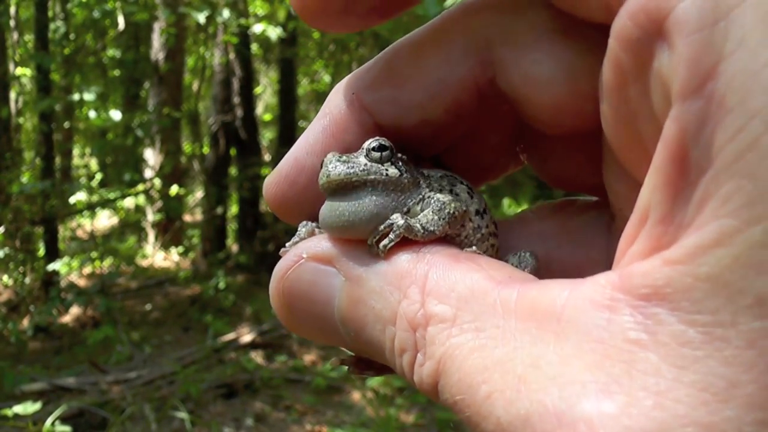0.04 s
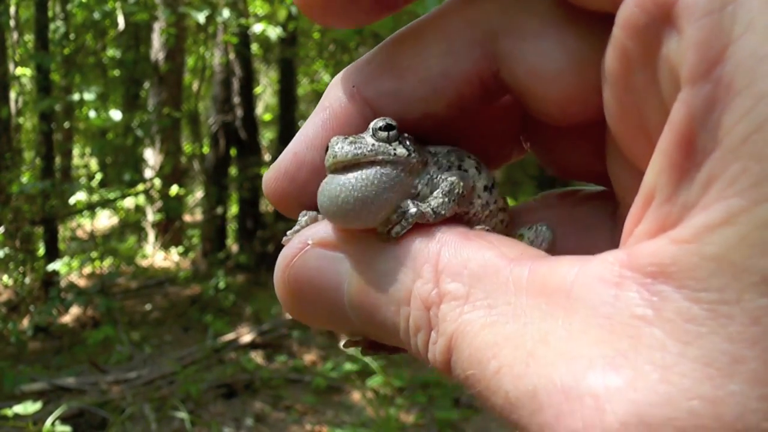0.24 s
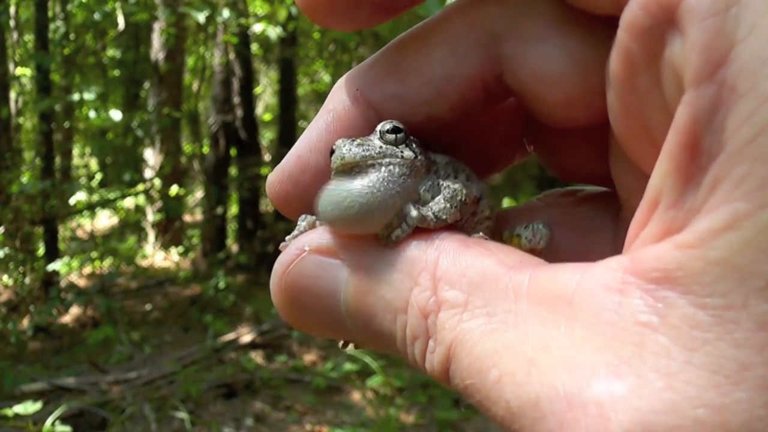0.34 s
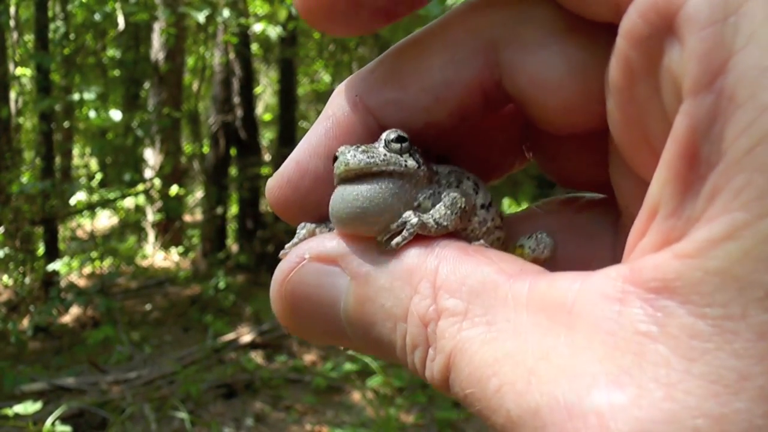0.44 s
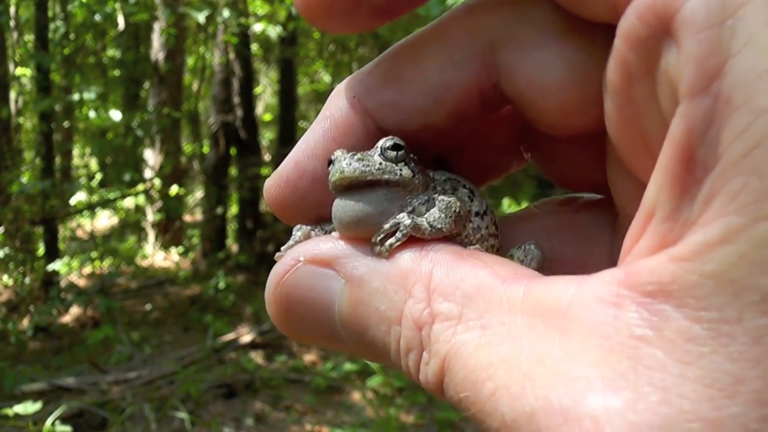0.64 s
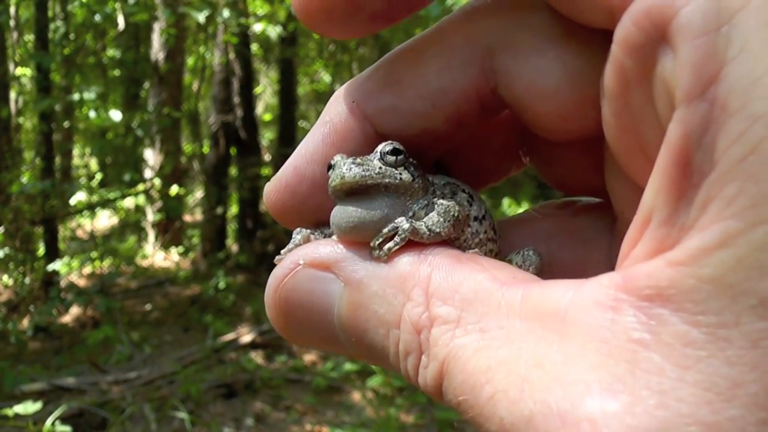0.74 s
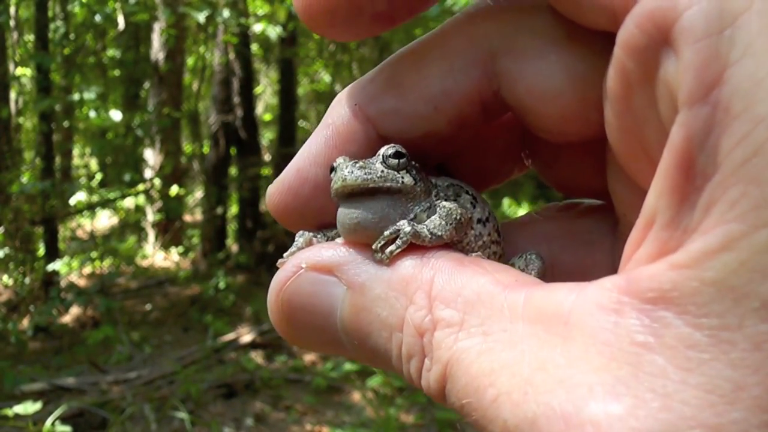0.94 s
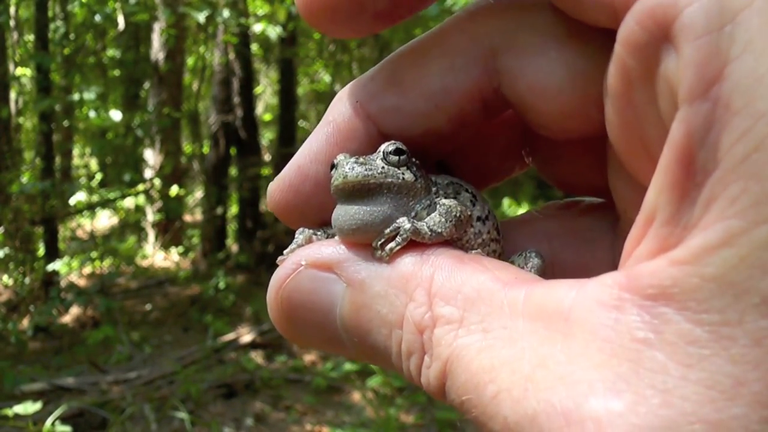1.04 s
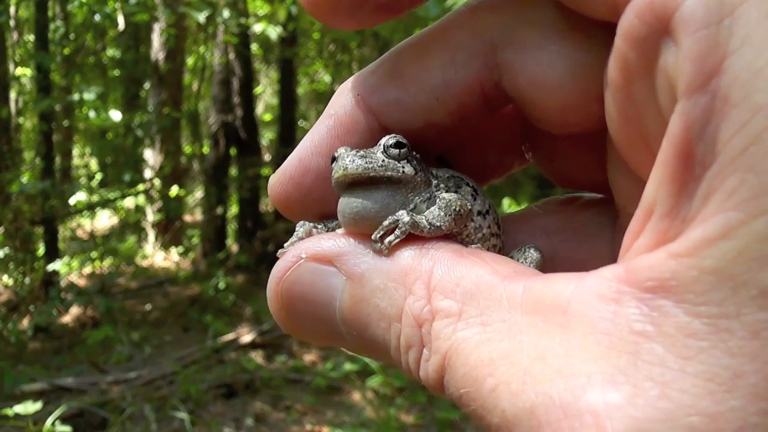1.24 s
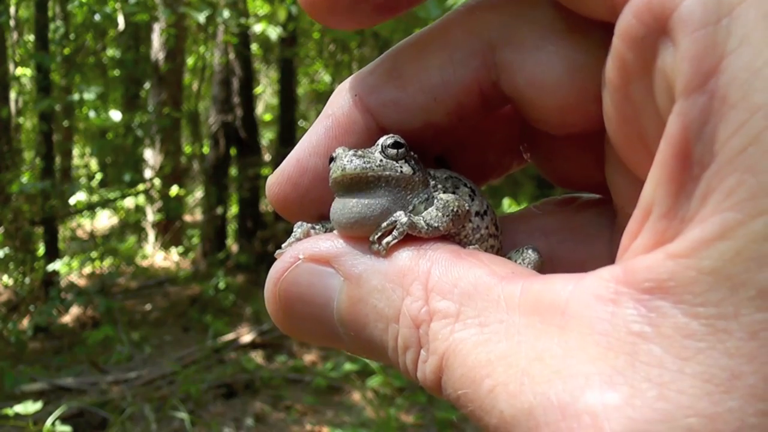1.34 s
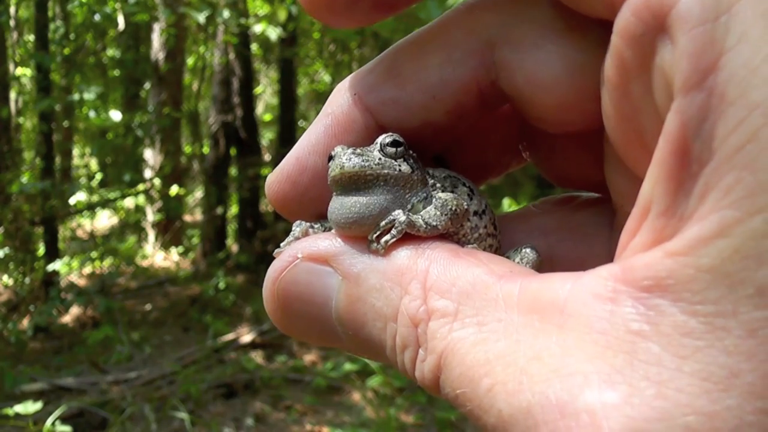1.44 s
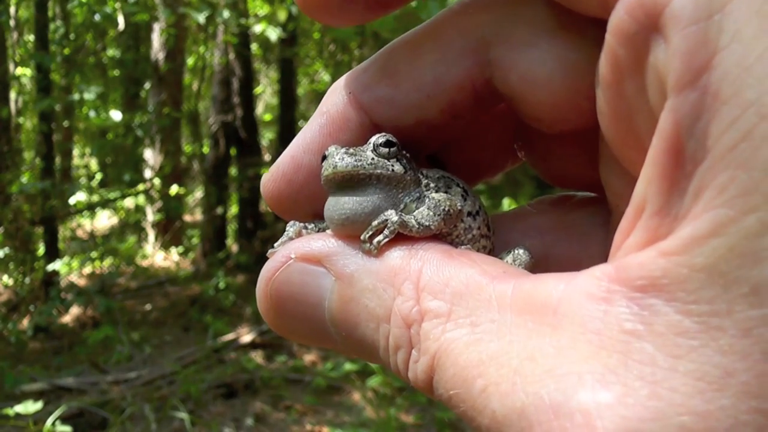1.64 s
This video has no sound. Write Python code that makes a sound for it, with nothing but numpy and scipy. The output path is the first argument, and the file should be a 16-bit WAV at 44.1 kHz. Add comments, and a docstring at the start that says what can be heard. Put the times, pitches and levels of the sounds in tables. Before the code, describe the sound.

A tree frog close to the microphone barks twice in quick succession, short and harsh, with a thin hiss between. Afterwards, faint rustles and a distant bird sound over the low, steady murmur of a wood.

```python
"""In a wood, a tree frog held in a hand close to the microphone gives two short harsh barks.
Each starts with a few loose pops of the larynx, then a fast, lurching pulse train rings the throat
and vocal sac. Air hisses between the barks; faint rustles and a far bird follow. The trees echo,
and the recorder's gain control ducks the murmur of the wood after each bark."""
import sys
import numpy as np
from scipy import signal
from scipy.fft import rfft, irfft
from scipy.io import wavfile
from scipy.ndimage import uniform_filter1d, minimum_filter1d

SR = 44100
rng = np.random.default_rng(int(sys.argv[2]) if len(sys.argv) > 2 else 0)


def wrap_up_sound(samples):
    """Save the sound to the file named by the first command line argument, as 16-bit audio."""
    columns = np.atleast_2d(samples).T
    # keep every value between -1 and 1, then stretch to whole-number steps
    tamed = np.clip(columns, -1, 1)
    steps = np.round(tamed * 32767).astype(np.int16)
    wavfile.write(sys.argv[1], SR, steps)


N = 74970
TIME, FREQS = np.arange(N) / SR, np.fft.rfftfreq(N, 1 / SR)


def amp(db):
    """Decibels to gain."""
    return 10 ** (np.asarray(db) / 20)


def unit_rms(x):
    """Scales to rms 1."""
    return x / np.sqrt(np.mean(x ** 2) + 1e-20)


def read(points, hz):
    """Reads a table on a log-frequency axis."""
    f, value = np.transpose(points)
    return np.interp(np.log(hz + 1), np.log(f + 1), value)


def add(mix, s, sound):
    """Mixes a sound in at time s."""
    part = mix[max(round(s * SR), 0):][:len(sound)]
    part += sound[:len(part)]


def noise(spectrum, size):
    """Noise of a given spectrum."""
    return unit_rms(irfft(rfft(rng.standard_normal(N)) * amp(read(spectrum, FREQS)), N))[:size]


def drift(rate_hz, size):
    """Random wander of rms about 1."""
    return unit_rms(irfft(rfft(rng.standard_normal(N)) * np.exp(-FREQS / rate_hz), N))[:size]


def ring(spectrum, size=2048):
    """Causal response of a body with a given spectrum, energy 1."""
    log_gain = np.log(amp(read(spectrum, abs(np.fft.fftfreq(size, 1 / SR)))))
    response = np.fft.ifft(np.exp(np.conj(signal.hilbert(log_gain)))).real[:size // 2]
    return response / np.linalg.norm(response)


def resonate(x, hz, width_hz):
    """A steady or gliding resonance of gain 1."""
    turn = np.exp(2j * np.pi * np.cumsum(hz * np.ones(len(x))) / SR)
    radius = np.exp(-np.pi * width_hz / SR)
    return 2 * (turn * signal.lfilter([1 - radius], [1, -radius], x / turn)).real


def tone(hz):
    """A sine that follows a pitch curve."""
    return np.sin(2 * np.pi * np.cumsum(hz) / SR)


# Murmur all around the microphone: f/Hz, relative level/dB
MURMUR_SPECTRUM = [(15, -47.5), (25, -23), (41, -13), (82, 0.5), (111, -1), (223, -5), (326, -2.5),
                   (363, -7.5), (394, -4.5), (516, -9), (677, -6.5), (1560, -13.5), (1940, -20.5),
                   (2160, -20), (6920, -32), (12900, -40.5), (16000, -46)]
# Likeness of its left and right channels: f/Hz, coherence/0-1
MURMUR_COHERENCE = [(60, 0.69), (130, 0.21), (290, 0.02), (640, 0.66), (1410, 0.88), (3100, 0.97),
                    (6820, 0.91), (15000, 0.2)]
# Hum in the distance: f/Hz, level/dB
HUM_TONES = [(120, -71), (399, -70.5), (699, -73)]
def wood(murmur_db=-54, waver=.003):
    """Steady murmur of the wood, with a faint distant hum."""
    coherence = np.clip(read(MURMUR_COHERENCE, FREQS), 0, 1)
    mid, side = (irfft(rfft(noise(MURMUR_SPECTRUM, N)) * np.sqrt(share / 2), N)
                 for share in (1 + coherence, 1 - coherence))
    hum = sum(amp(db) * np.sqrt(2) * tone(hz * (1 + waver * drift(10, N))) for hz, db in HUM_TONES)
    return amp(murmur_db) * np.array([mid + side, mid - side]) + hum


# Larynx pops, close up: t/s, relative level/dB, pitch/ratio to POP_SPECTRUM
LARYNX_POPS = [(.2186, -25, .75), (.2220, -11, .9), (.4038, -24, 1), (.4069, -11, 1), (.4080, -3, 1.03)]
# Colour of one pop: f/Hz, relative level/dB
POP_SPECTRUM = [(100, -42.5), (600, -29), (1200, -6), (2000, 4), (2900, -0.5), (3700, -10.5), (4500, -26.5),
                (6500, -42.5), (8400, -27.5), (11000, -51.5), (16000, -62.5)]
def pops(gain_db=.5):
    """The larynx lets go a few loose, single pulses before each bark."""
    out = np.zeros(N)
    for s, db, pitch in LARYNX_POPS:
        pop = ring(np.array(POP_SPECTRUM) * [pitch, 1])
        add(out, s, amp(gain_db + db) * pop / abs(pop).max())
    return out


# Echo from the surrounding trees: f/Hz, time to fall 60 dB/s, relative level/dB
TREE_ECHO = [(200, .4, -4), (1500, 0.92, 0), (2000, .6, 3.5), (2400, .6, -2.5), (2770, 0.58, 3),
             (3500, 0.96, 0.5), (7000, 0.42, 3), (14000, 0.15, -0.5)]
def trees(x, spread=.35):
    """Trunks and leaves scatter the sound into a diffuse stereo tail."""
    hz, t, spectra = signal.stft(rng.standard_normal((2, SR)), SR, nperseg=256)
    t60, db = (read(np.array(TREE_ECHO)[:, [0, k]], hz)[:, None] for k in (1, 2))
    mid, side = signal.istft(spectra * amp(db - 60 * t / t60), SR, nperseg=256)[1]
    tail = np.array([mid + spread * side, mid - spread * side]) / np.linalg.norm(mid)
    return signal.fftconvolve(x[None], tail, axes=1)[:, :N]


def larynx(times, rate_hz, level_db, roughness, jitter=.14, shimmer_db=5, air_db=-2):
    """A train of pulses, each with a breath of air; roughness upsets their timing and strength."""
    pulses, air, taps = np.zeros(N), np.zeros(N), np.arange(64)
    at, lead = times[0], len(taps) // 2
    for late, strong in rng.standard_normal((80, 2)):
        if at > times[-1]:
            break
        harsh, period = np.interp(at, times, roughness), 1 / np.interp(at, times, rate_hz)
        size = amp(np.interp(at, times, level_db) + shimmer_db * harsh * strong) * np.sqrt(period * SR)
        pulse = np.sinc(taps - lead - at * SR + round(at * SR)) * np.hanning(len(taps))
        add(pulses, at - lead / SR, size * pulse)
        add(air, at, size * harsh * np.exp(-taps / 16) / np.sqrt(8))
        at += period * np.exp(jitter * harsh * late)
    return pulses + amp(air_db) * air * rng.standard_normal(N)


def smear(x, hz=2300, width_hz=1300):
    """An all-pass spreads each pulse in time without changing its spectrum."""
    radius = np.exp(-np.pi * width_hz / SR)
    poles = [1, -2 * radius * np.cos(2 * np.pi * hz / SR), radius ** 2]
    return signal.lfilter(poles[::-1], poles, x)


# The frog at the microphone, one list per bark:
# t/s, pulse rate/Hz, relative level/dB, roughness/0-1, upper resonance f/Hz, its gain/dB
BARK_CURVES = [
    [(.2299, 857, -8.5, .3, 8100, 14), (.2345, 833.7, -14, .45, 8000, 14),
     (.2385, 930.6, -11, .25, 7920, 17.5), (.243, 992, -15, 0.42, 8000, 7),
     (.246, 765.7, -1.5, .7, 8230, 3.5), (.249, 906, -8, .15, 8230, 6.5), (.254, 887, -9, .15, 7964, 5.5),
     (.2585, 779, -20, .5, 5980, 7.5), (.2625, 820, -8, .15, 6200, 11.5), (.268, 747, -9, .2, 6720, 16),
     (.274, 696, -33.5, .2, 6910, -1.5)],
    [(.4263, 490.4, -5, .4, 5500, 11), (.4296, 720, 2, 0.31, 5562, 4.5), (.4315, 794, -5, 0.4, 5580, -3),
     (.4345, 681, -2, .25, 6026, -4), (.438, 1007, -4, .12, 6650, 12), (.441, 960, -2.5, .1, 6645, 17),
     (.445, 765, -5, .4, 6800, 4.5), (.450, 987, -6, 0.17, 6870, 23.5), (.454, 1009, -5, .05, 7190, 8),
     (.4605, 860, -8, 0.17, 8000, 16), (.4652, 760, -20, .3, 8200, 8)],
]
# Colour of throat and vocal sac: f/Hz, relative level/dB in the first bark, in the second
THROAT_SPECTRA = [(100, -41, -43), (550, -25, -31.5), (892, -16, -16.5), (1247, -4, -2.5),
                  (1574, 0.5, -5.5), (2050, -3, 0.5), (2818, -2.5, -3), (3375, -9.5, -6), (3970, -9.5, -8),
                  (5120, -12, -23.5), (6390, -29, -26.5), (8300, -30, -28.5), (10510, -39.5, -42),
                  (13000, -42.5, -50), (16000, -52.5, -60)]
# Main resonances, ringing on from pulse to pulse: f/Hz, width/Hz, gain/dB
THROAT_FORMANTS = [(1945, 680, 0.5), (2670, 350, -3.5)]
def barks(upper_width_hz=600, top_db=-4.5):
    """Larynx pulses ring the throat and sac, a gliding upper resonance and a faint one above it."""
    out = np.zeros(N)
    highpass = signal.butter(2, 4500, "high", fs=SR, output="sos")
    for k, curve in enumerate(BARK_CURVES):
        times, rate_hz, db, roughness, upper_hz, upper_db = np.transpose(curve)
        throat = ring(np.array(THROAT_SPECTRA)[:, [0, k + 1]])
        voice = signal.oaconvolve(larynx(times, rate_hz, db, roughness), throat)[:N]
        formants = sum(amp(gain) * resonate(voice, hz, width) for hz, width, gain in THROAT_FORMANTS)
        treble = signal.sosfilt(highpass, voice) * amp(np.interp(TIME, times, upper_db))
        upper = resonate(treble, np.interp(TIME, times, upper_hz), upper_width_hz)
        top = amp(top_db) * resonate(treble, hz=12500, width_hz=900)
        out += smear((voice + formants + upper + top) / 2)
    return out


# Pushes of air, close up: t/s, level/dB, f/Hz
AIR_PUFFS = [(0.231, -40, 300), (0.2457, -29.5, 300), (0.4276, -9, 500)]
def puffs(rise_s=.0009, thump_hz=75.6, thump_decay_s=.007, thump_db=-8.5):
    """A low push of air and a soft thump as the voice breaks in."""
    out, t = np.zeros(N), TIME[:SR // 10]
    thump = amp(thump_db) * np.sin(2 * np.pi * thump_hz * t) * np.exp(-t / thump_decay_s)
    for s, db, hz in AIR_PUFFS:
        push = np.sin(2 * np.pi * hz * t) * t / rise_s * np.exp(1 - t / rise_s)
        add(out, s, amp(db) * (push + thump))
    return out


# Air from the frog, close up: f/Hz, relative level/dB
HISS_SPECTRUM = [(1000, -40), (5400, -28), (6400, -3), (7100, -2), (8300, -3.5), (9000, -27),
                 (16000, -47.5)]
def hiss(start_s=.24, end_s=.41, db=-44.5, fade_db_per_s=105):
    """A thin hiss of air fades between the barks."""
    out, t = np.zeros(N), np.arange(0, end_s - start_s, 1 / SR)
    add(out, start_s, noise(HISS_SPECTRUM, len(t)) * amp(db - fade_db_per_s * t))
    return out


# Faint dry rustles in the background: t/s, length/s, level/dB
DRY_RUSTLES = [(0.913, 0.0065, -71.5), (1.06, 0.065, -67.5), (1.141, 0.063, -72), (1.235, 0.085, -72)]
# Their colour: f/Hz, relative level/dB
RUSTLE_SPECTRUM = [(1500, -12), (4500, -5), (7500, -0.5), (10500, -11), (13500, -8), (15000, -19),
                   (16000, -30)]
def rustles(grain_db=4):
    """Brief grainy scuffs that swell quickly and fade away."""
    out = np.zeros(N)
    for s, length, db in DRY_RUSTLES:
        progress = np.linspace(0, 1, int(length * SR))
        scuff = noise(RUSTLE_SPECTRUM, len(progress)) * amp(grain_db * drift(190, len(progress)))
        swell = np.sqrt(abs(np.sin(np.pi * np.sqrt(progress))))
        add(out, s, amp(db) * unit_rms(scuff * swell))
    return out


# A bird far off in the wood: t/s, length/s, start f/Hz, middle f/Hz, end f/Hz, level/dB
BIRD_CHIRPS = [(1.2, 0.037, 4100, 5150, 4600, -64.5), (1.233, 0.039, 4700, 4034, 2950, -61),
               (1.258, .032, 7200, 5390, 4140, -70.5), (1.396, 0.0185, 7400, 6600, 6000, -70.5)]
def bird(waver=.012, flutter_db=3.5):
    """Thin, fluttering whistles that arch and fall."""
    out = np.zeros(N)
    for s, length, *pitches_hz, db in BIRD_CHIRPS:
        progress = np.linspace(0, 1, int(length * SR))
        arch_hz = np.polyval(np.polyfit([0, .5, 1], pitches_hz, 2), progress)
        whistle = tone(arch_hz * (1 + waver * drift(300, len(progress))))
        swell = np.sqrt(2 * abs(np.sin(np.pi * progress)))
        add(out, s, amp(db + flutter_db * drift(130, len(progress))) * swell * whistle)
    return out


def scene(hand_db=-30, hand_delay_s=.0006, frog_echo_db=-43, bird_echo_db=-7):
    """The frog close and central, everything else far behind it."""
    frog = pops() + barks() + puffs() + hiss()
    far_bird = bird()
    # A weak reflection off the hand differs at the two microphone ports.
    hand = amp(hand_db) * np.array([[1], [-1]]) * np.roll(frog, int(hand_delay_s * SR))
    into_trees = amp(frog_echo_db) * frog + amp(bird_echo_db) * far_bird
    return frog + hand + far_bird + rustles() + trees(into_trees) + wood()


def gain_control(x, window, threshold_db=-13.5, slope=.82, hold_s=.11, recover_db_per_s=34):
    """The recorder clamps its gain on each bark, holds, and slowly recovers."""
    hold = int(hold_s * SR)
    power_db = 10 * np.log10(abs(uniform_filter1d((x ** 2).mean(0), window)) + 1e-12)
    held_db = -minimum_filter1d(-power_db, hold, origin=(hold - 1) // 2, mode="nearest")
    fall_db = TIME * recover_db_per_s  # the detector's fall; the gain follows it times slope
    detector_db = np.maximum.accumulate(held_db + fall_db) - fall_db
    over_db = np.maximum(detector_db - threshold_db, 0)
    return x / amp(slope * uniform_filter1d(over_db, window))


def record(dry, window_s=.0017, peak_limit=.5, notch_hz=2508, notch_width_hz=120, edge_hz=16500):
    """The recorder: gain control, peak limiter, a notch that rings after sharp pulses, band limit."""
    window = int(window_s * SR)
    ducked = gain_control(dry, window)
    allowed = np.minimum(1, peak_limit / (abs(ducked).max(0) + 1e-9))
    limited = ducked * uniform_filter1d(minimum_filter1d(allowed, window), window)
    notched = signal.lfilter(*signal.iirnotch(notch_hz, notch_hz / notch_width_hz, fs=SR), limited)
    lowpass = signal.firwin(511, edge_hz, window=("kaiser", 9), fs=SR)
    return signal.oaconvolve(notched, lowpass[None], "same")


dry = scene()
out = record(dry)
wrap_up_sound(out)
```